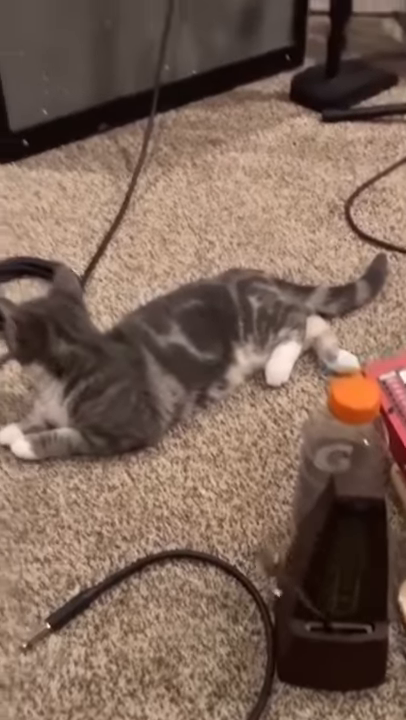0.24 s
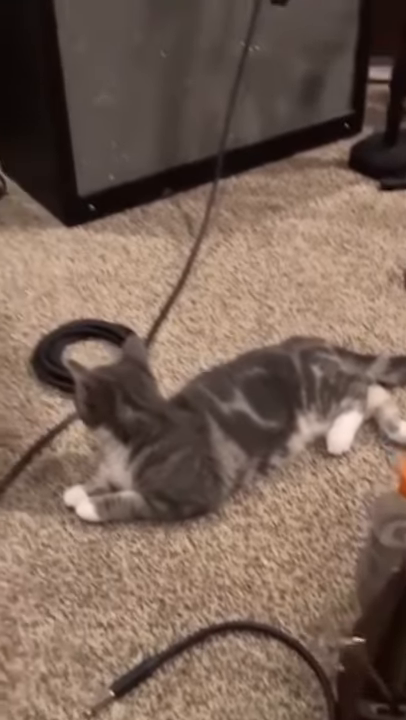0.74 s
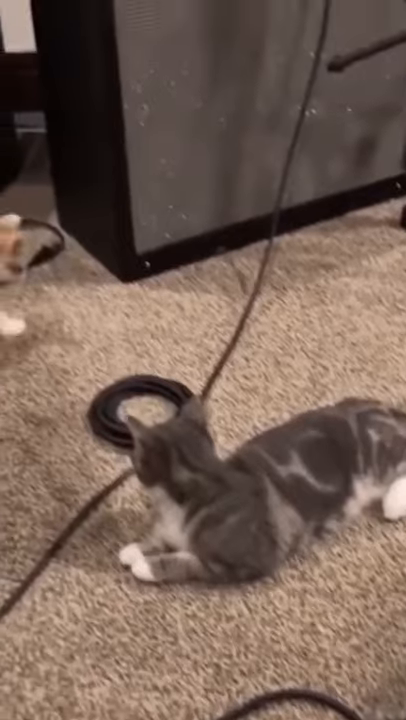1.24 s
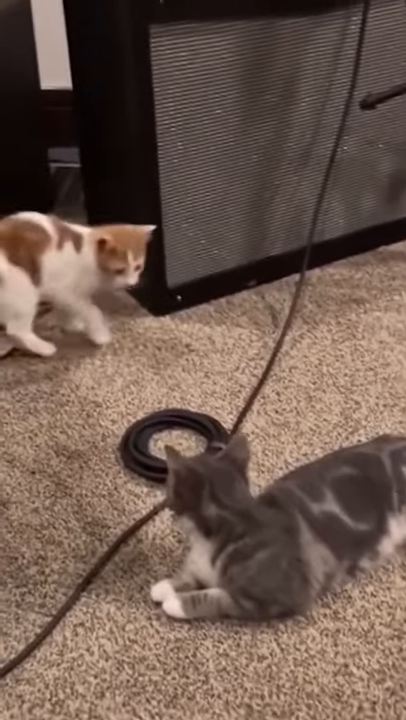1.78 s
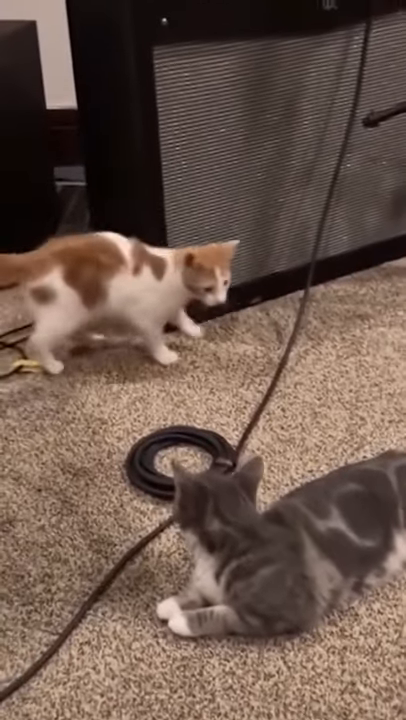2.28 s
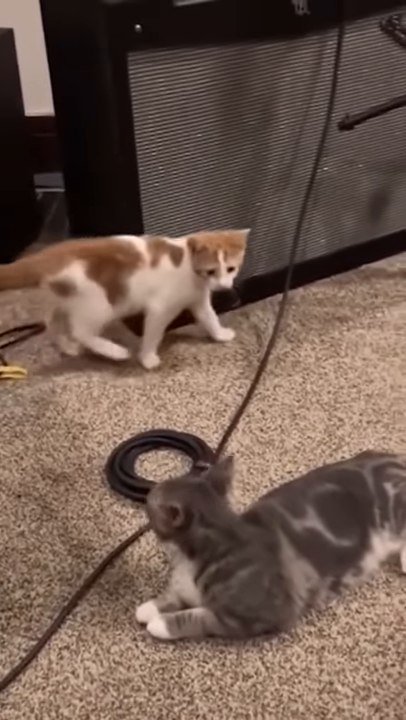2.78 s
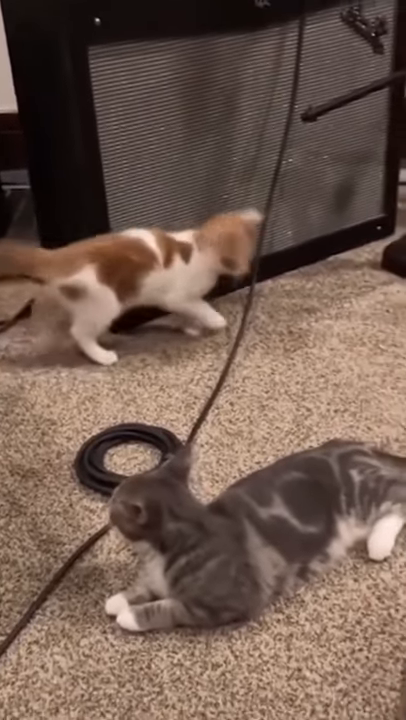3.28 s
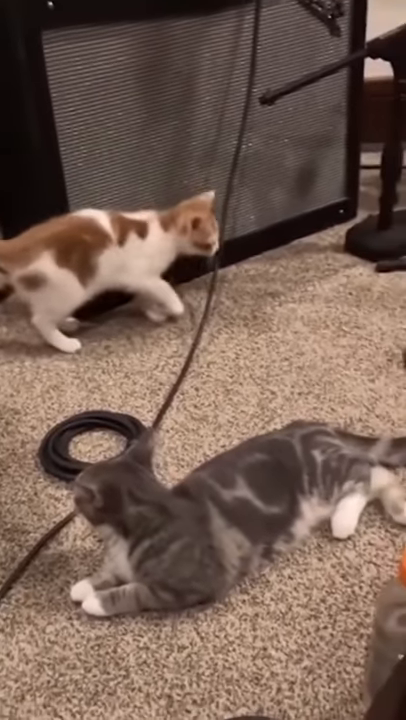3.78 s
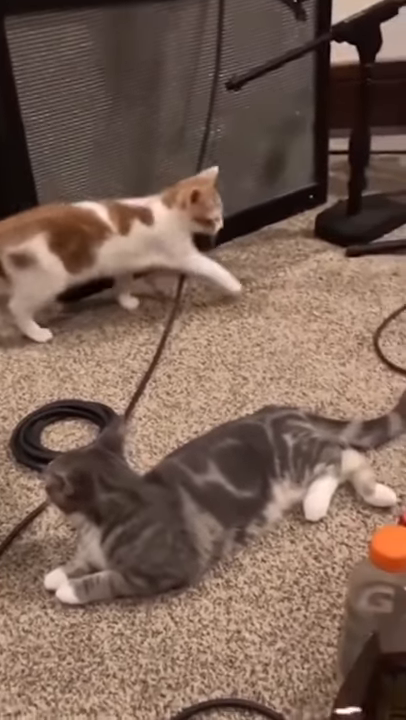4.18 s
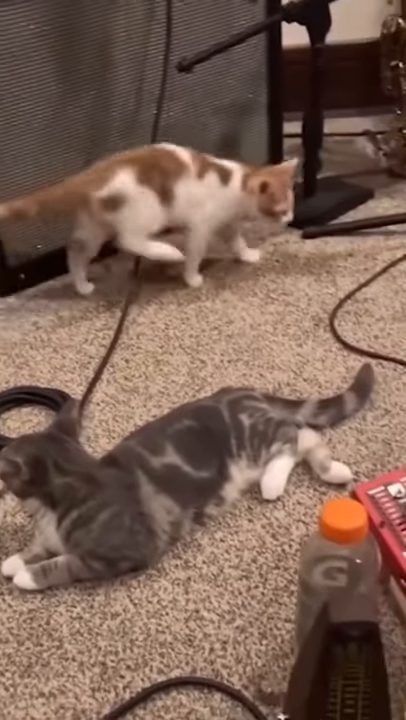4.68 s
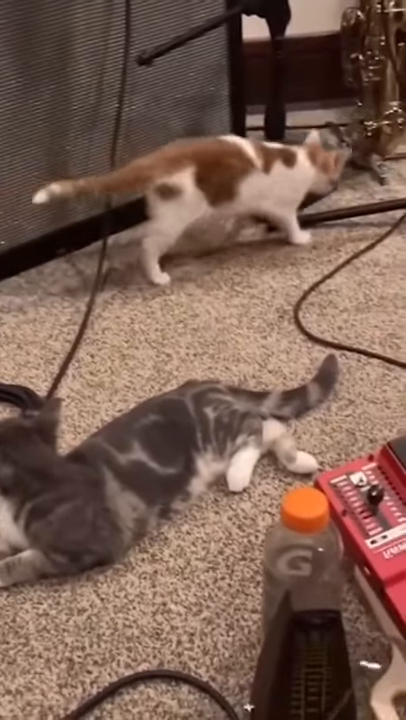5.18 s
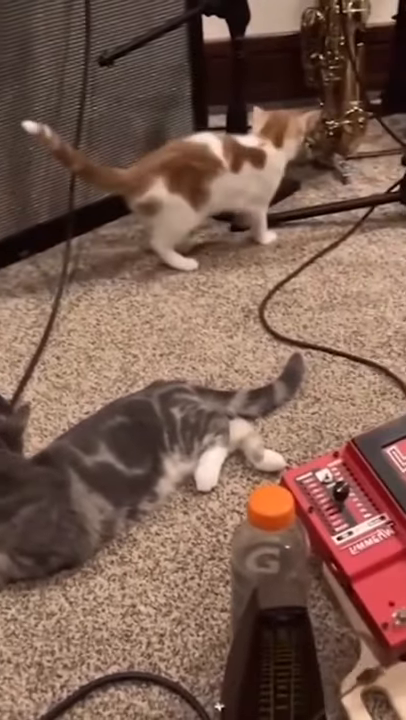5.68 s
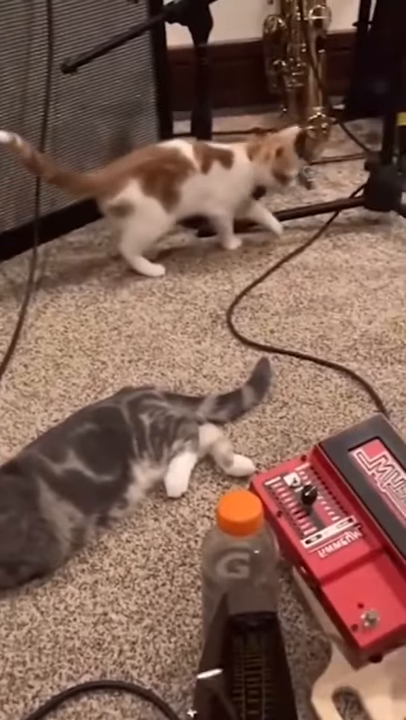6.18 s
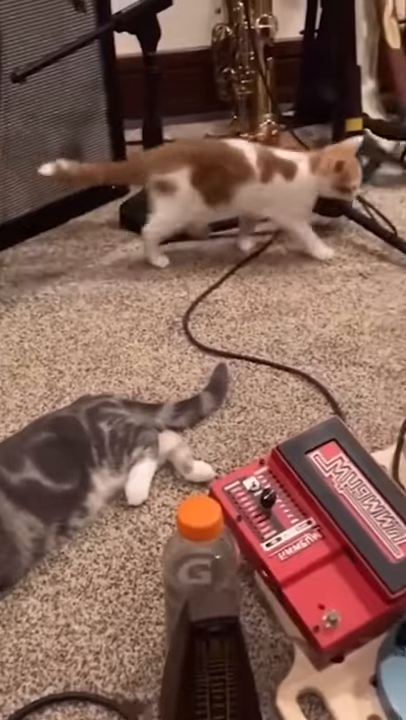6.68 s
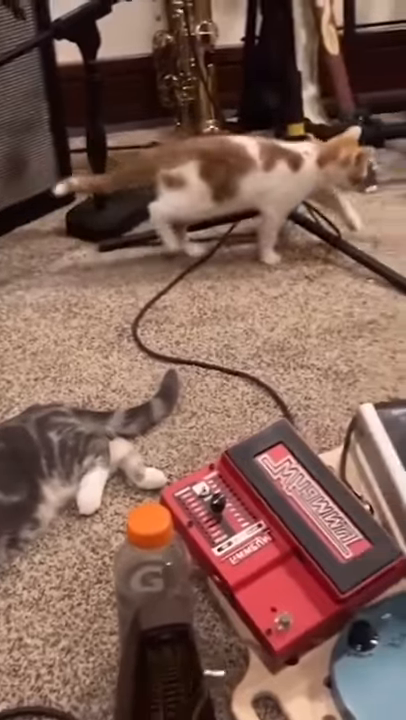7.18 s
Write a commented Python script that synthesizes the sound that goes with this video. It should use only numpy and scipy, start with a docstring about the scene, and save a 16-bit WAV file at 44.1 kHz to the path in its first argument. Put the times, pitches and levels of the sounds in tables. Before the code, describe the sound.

A wooden clockwork metronome ticks steadily about once a second, close by in a small carpeted room, over a very faint low hum.

```python
"""Clockwork metronome in a small room

A wooden clockwork metronome beats about once a second on a carpeted floor, close to a moving microphone.
Each beat is an escapement blow: a few contacts excite decaying sine modes of the hollow case, and shaped
noise gives the brief rattle of the metal. Left and right swings differ a little.
Two dulled echoes and a noise-built reverberant tail give the small damped room.
A low building hum and faint hiss, made of filtered noise, lie underneath."""
import sys
import numpy as np
from scipy import signal
from scipy.fft import rfft, irfft
from scipy.io import wavfile

SR = 44100
rng = np.random.default_rng(int(sys.argv[2]) if len(sys.argv) > 2 else 0)


def transcribe(signal):
    """Save signal, clipped to [-1, 1], as a 16-bit WAV file at the path in sys.argv[1]."""
    frames = np.atleast_2d(signal).T
    limited = np.clip(frames, -1, 1)
    pcm = np.round(limited * 32767).astype(np.int16)
    wavfile.write(sys.argv[1], SR, pcm)


N = 328545


def from_db(db):
    """Logarithmic level: decibels to amplitude gain."""
    return 10 ** (np.asarray(db) / 20)


def rms_one(x):
    """Normalization: scale a signal to rms 1."""
    return x / np.sqrt(np.mean(x ** 2) + 1e-20)


def at_hz(points, hz):
    """Interpolation: read a (f, value) table on a log-frequency axis."""
    table = np.array(points)
    return np.interp(np.log(np.maximum(hz, 1)), np.log(table[:, 0]), table[:, 1])


def colour(x, points):
    """Linear filtering: weight the spectrum by a (f/Hz, level/dB) table."""
    gain = from_db(at_hz(points, np.fft.rfftfreq(len(x), 1 / SR)))
    return irfft(rfft(x) * gain, len(x))


def drift(rate_hz):
    """Slow random modulation: straight lines between normal random knots of spread 1."""
    knots = rng.standard_normal(200)
    return np.interp(np.arange(N) / SR * rate_hz, np.arange(200), knots)


HUM_WAVER_DB, HUM_WAVER_HZ = 1.0, 2.5


def waver():
    """Amplitude modulation: a gain in decibels that wanders slowly."""
    return from_db(HUM_WAVER_DB * drift(HUM_WAVER_HZ))


# Relative spectral density of the broad background: f/Hz, level/dB
AIR_SPECTRUM = [(22, -44.5), (32, -19.5), (48, -2.5), (130, 0), (200, -3), (400, -18.5), (450, -28.5),
                (720, -27), (1000, -29), (1700, -31.5), (1900, -37.5), (4800, -45), (5600, -54),
                (10000, -57), (16000, -58)]
AIR_DB = -57.5  # rms


def broad_background():
    """Broadband noise: random noise shaped into low rumble and faint hiss."""
    noise = rms_one(colour(rng.standard_normal(N), AIR_SPECTRUM))
    return from_db(AIR_DB) * waver() * noise


# Narrow humps where the room favours the rumble: f/Hz, pole width/Hz, rms level/dB
HUM_RESONANCES = [(146, 4.1, -69), (158.65, 2.7, -64), (222.9, 2.7, -68.5), (255.1, 6.9, -65),
                  (271.8, 2.4, -70.5), (360.2, 10, -73.5), (492.2, 25, -85), (690.5, 27, -78.5),
                  (765.6, 13, -81), (963, 2.7, -87), (2486, 58, -94)]


def hum_resonances():
    """Resonance: two-pole filters select narrow wavering bands of noise."""
    out = np.zeros(N)
    for hz, width_hz, level_db in HUM_RESONANCES:
        radius = np.exp(-2 * np.pi * width_hz / SR)
        section = [1, 0, -1, 1, -2 * radius * np.cos(2 * np.pi * hz / SR), radius ** 2]
        hump = signal.sosfilt([section, section], rng.standard_normal(N))  # two equal passes
        out += from_db(level_db) * waver() * rms_one(hump)
    return out


# Side level of the hum relative to the middle: f/Hz, level/dB
HUM_SIDE_LEVEL = [(60, -38), (200, -53), (380, -25), (700, -9), (1290, -4.5), (4400, -5), (15000, -0.5)]


def building_hum():
    """Interaural coherence: (mid, side) hum, nearly alike at both ears in the bass, less so in the treble."""
    mid = broad_background() + hum_resonances()
    side = broad_background() + hum_resonances()
    return mid, colour(side, HUM_SIDE_LEVEL)


def ring(clicks, hz, t60):
    """Damped free vibration: a unit click sets a sine of height 1 ringing."""
    radius = from_db(-60 / (max(t60, .005) * SR))
    angle = 2 * np.pi * hz / SR
    return signal.lfilter([0, np.sin(angle)], [1, -2 * radius * np.cos(angle), radius ** 2], clicks)


# The pallet lands on two edges, then bounces at a steady rate, weaker each time
SECOND_EDGE_S, SECOND_EDGE_DB = .00047, 2.4
BOUNCE_S, FIRST_BOUNCE_DB, BOUNCE_LOSS_DB, BOUNCES = .00235, -1, 4.5, 3


def pallet_contacts():
    """Repeated impact: the (delay/s, level/dB) of each contact in one blow."""
    edges = [(0, 0), (SECOND_EDGE_S, SECOND_EDGE_DB)]
    bounces = [(BOUNCE_S * (n + 1), FIRST_BOUNCE_DB - BOUNCE_LOSS_DB * n) for n in range(BOUNCES)]
    return edges + bounces


# Modes of case and works: f/Hz, left-swing level/dB, right-swing level/dB, t60/s; levels are relative
CASE_MODES = [(413.4, -29.5, -33, 0.078), (743, -17, -9, 0.21), (976, -22.5, -29, 0.013),
              (1150, -25, -37, 0.027), (1281, 0.5, 0, 0.036), (1710, -12.5, -14, 0.017),
              (1804, -12.5, 1.5, 0.067), (1790, -4.5, 4, 0.022), (2124, 3, 0.5, 0.042),
              (2120, -45.5, -44.5, 1), (2150, -38, -36.5, 0.39), (2606, 0.5, -0.5, 0.0054),
              (2903, -14.5, -13, 0.06), (3380, -17.5, -17.5, 0.025), (4062, -33, -28, 0.0084),
              (4650, -30.5, -20.5, .025), (5120, -13.5, -26.5, 0.018), (6020, -15.5, -16.5, 0.022),
              (6356, -16.5, -17.5, 0.033), (6850, -17.5, -19.5, .025), (7440, -16, -21.5, 0.015),
              (9120, -24, -16.5, 0.017), (9600, -29, -22, 0.019), (10750, -29, -18.5, 0.015),
              (11080, -30.5, -20.5, 0.023), (13970, -29.5, -50, 0.033), (15300, -32, -35, .03)]
MIDDLE_FROM_HZ, BRIGHT_FROM_HZ = 1700, 3000


def case_ring(middle_db, bright_db, swing):
    """Modal superposition: the contacts excite every mode of the case; peak 1."""
    out = np.zeros(SR // 2)
    for k, (hz, *swing_db, t60) in enumerate(CASE_MODES):
        clicks = np.zeros(len(out))
        for delay, contact_db in pallet_contacts():
            clicks[round(delay * SR)] += from_db(contact_db + rng.normal(0, 1.5))
        if hz > BRIGHT_FROM_HZ:
            tone_db = bright_db
        elif hz > MIDDLE_FROM_HZ:
            tone_db = middle_db
        else:
            tone_db = 0
        sign = (-1) ** k  # neighbours in the table start in opposition
        out += sign * from_db(swing_db[swing] + tone_db) * ring(clicks, hz, t60)
    return out / np.abs(out).max()


# Relative spectrum of the metal's crack, near and in the room: f/Hz, level/dB
CRACK_SPECTRUM = [(300, -23), (700, 7), (2000, 6.5), (5000, -5.5), (7000, -7.5), (11200, -5.5),
                  (12000, -13), (16000, -14.5)]
CRACK_RISE_S, CRACK_T60_S = 0.0014, .04


def metal_crack(bright_db):
    """Transient broadband radiation: the metal rattles as a brief burst of shaped noise."""
    t = np.arange(SR // 2) / SR
    rattle = rms_one(colour(rng.standard_normal(len(t)), CRACK_SPECTRUM))
    rise = 1 - np.exp(-t / CRACK_RISE_S)
    return from_db(bright_db - 60 * t / CRACK_T60_S) * rise * rattle


# Early reflections from the walls: delay t/s, left-swing level/dB, right-swing level/dB
WALL_REFLECTIONS = [(0.017, -6.5, -5), (0.029, -11, -14)]
WALL_CUT_HZ = 3000


def wall_echoes(near, swing):
    """Specular reflection with absorption: delayed copies from soft walls that return little treble."""
    pole = np.exp(-2 * np.pi * WALL_CUT_HZ / SR)
    dulled = signal.lfilter([1 - pole], [1, -pole], near)
    out = np.zeros(SR)
    for delay, *echo_db in WALL_REFLECTIONS:
        start = round(delay * SR)
        out[start:start + len(near)] += from_db(echo_db[swing]) * dulled
    return out


# Reverberation time of the first decay: f/Hz, t60/s
ROOM_DECAY = [(300, 0.18), (700, 0.19), (2000, 0.28), (4000, 0.22), (8000, 0.12), (15000, 0.11)]
# Relative level of the reverberation: f/Hz, level/dB
ROOM_SPECTRUM = [(300, 15), (1000, -6.5), (3000, -4), (8000, 7.5), (15000, 5.5)]
LINGER_DB, LINGER_STRETCH = -18, 2.4  # a weaker, slower second decay from the less damped corners


def room_answer(rise_s):
    """Diffuse reverberation: dense reflections build up, each half octave dying at its own rate."""
    t = np.arange(SR // 2) / SR
    edges = 250 * 2 ** np.arange(0, 6.1, .5)
    out = np.zeros(len(t))
    for low, high in zip(edges, edges[1:]):
        half_octave = signal.butter(2, [low, high], "band", fs=SR, output="sos")
        band = signal.sosfilt(half_octave, rng.standard_normal(len(t)))
        hz = np.sqrt(low * high)
        fall_db = -60 * t / at_hz(ROOM_DECAY, hz)
        decay = np.hypot(from_db(fall_db), from_db(LINGER_DB + fall_db / LINGER_STRETCH))
        out += from_db(at_hz(ROOM_SPECTRUM, hz)) * decay * band
    return out * (1 - np.exp(-(t / rise_s) ** 2)) / np.sqrt(SR / 100)


# Beats, left and right swings alternating: t/s, peak level of the near ring/dB,
# level of the middle modes/dB, level of the upper modes and crack/dB
SWING_BEATS = [(0.274, -23.5, -2, 4), (1.293, -27, -5, 5.5), (2.295, -26.5, -10.5, 6),
               (3.316, -26, -6, 6.5), (4.317, -24.5, -4.5, 5), (5.338, -24, -6, 3.5),
               (6.339, -24, -4.5, 4.5), (7.36, -24.5, -5.5, 2.5)]
# Side level of the late reflections relative to the middle: f/Hz, level/dB
REVERB_SIDE_LEVEL = [(200, -36), (380, -22), (700, -9), (1290, 2), (2300, -3), (4400, -1), (9000, -1),
                     (15000, 1)]
CRACK_NEAR_DB = -10.5
# The room changes less than the near sound as the microphone moves
ROOM_DB, ROOM_FOLLOWS, MEAN_PEAK_DB = -4.5, .7, -24.5
RING_ROOM_DB, SNAP_ROOM_DB = -5, 16.5  # the ring reaches the room weaker than the snap
ROOM_RISE_S, SIDE_RISE_S = .015, .02


def metronome():
    """Direct and reverberant fields: beats as (mid, side), near sound and echoes central, the tail in both."""
    mid, side = np.zeros((2, N + SR))
    for k, (s, peak_db, middle_db, bright_db) in enumerate(SWING_BEATS):
        swing = k % 2  # 0 left, 1 right
        at = round(s * SR)
        modes = case_ring(middle_db, bright_db, swing)
        near = modes + from_db(CRACK_NEAR_DB) * metal_crack(bright_db)
        mid[at:at + len(near)] += from_db(peak_db) * near
        echoes = wall_echoes(near, swing)
        mid[at:at + len(echoes)] += from_db(peak_db) * echoes

        room_db = ROOM_DB + MEAN_PEAK_DB + ROOM_FOLLOWS * (peak_db - MEAN_PEAK_DB)
        # the broadband snap spreads all round and fills the tail evenly
        snap = from_db(room_db + SNAP_ROOM_DB + bright_db)
        for channel, rise_s in ((mid, ROOM_RISE_S), (side, SIDE_RISE_S)):
            answer = room_answer(rise_s)  # the microphone has moved: new reflections each beat
            tail = signal.fftconvolve(from_db(room_db + RING_ROOM_DB) * modes, answer)
            channel[at:at + len(tail)] += tail
            channel[at:at + len(answer)] += snap * colour(answer, CRACK_SPECTRUM)
    return mid[:N], colour(side, REVERB_SIDE_LEVEL)[:N]


def scene():
    """Linear superposition: beats over the hum, mid and side combined into left and right."""
    hum_mid, hum_side = building_hum()
    beat_mid, beat_side = metronome()
    mid, side = beat_mid + hum_mid, beat_side + hum_side
    return np.array([mid + side, mid - side])


CUTOFF_HZ = 16400


def record(dry):
    """Band limitation: a steep low-pass cuts the top."""
    low_pass = signal.cheby2(12, 60, CUTOFF_HZ, fs=SR, output="sos")
    return signal.sosfilt(low_pass, dry)


dry = scene()
out = record(dry)
transcribe(out)
```